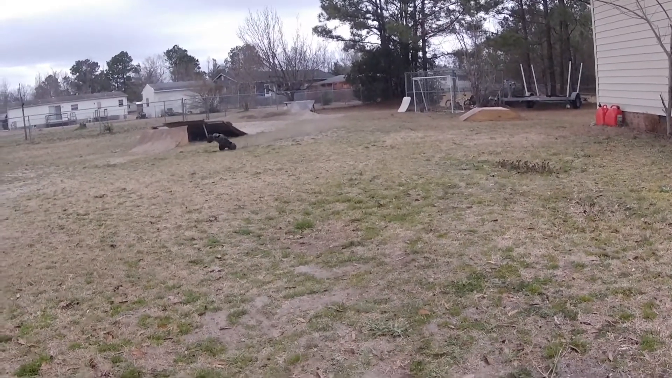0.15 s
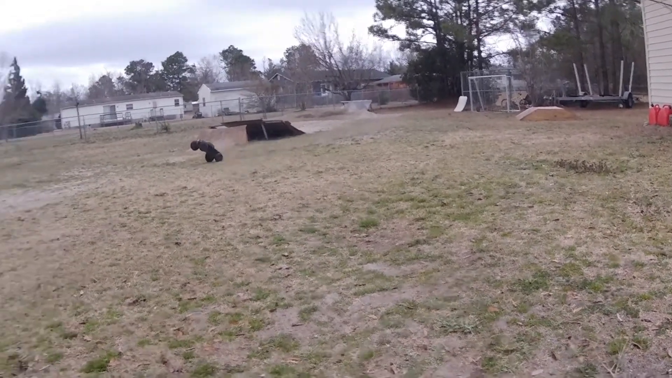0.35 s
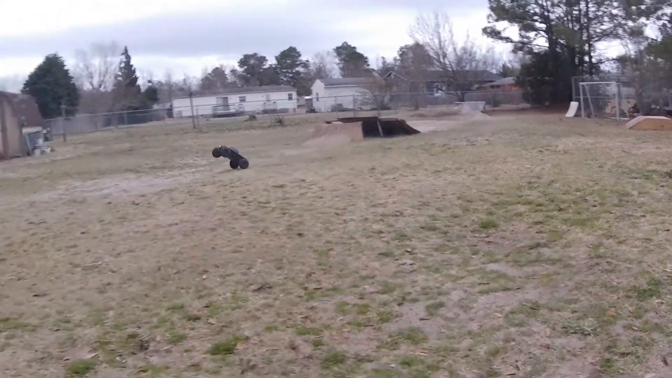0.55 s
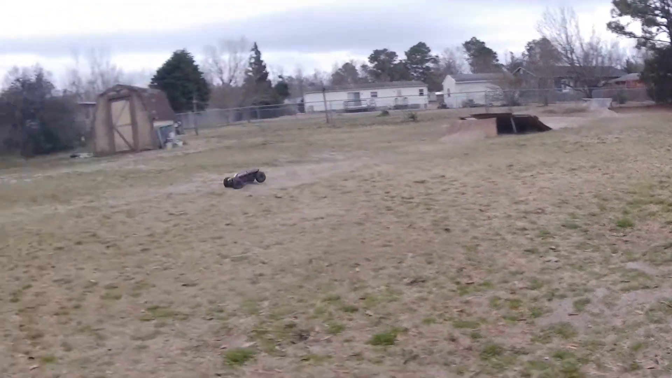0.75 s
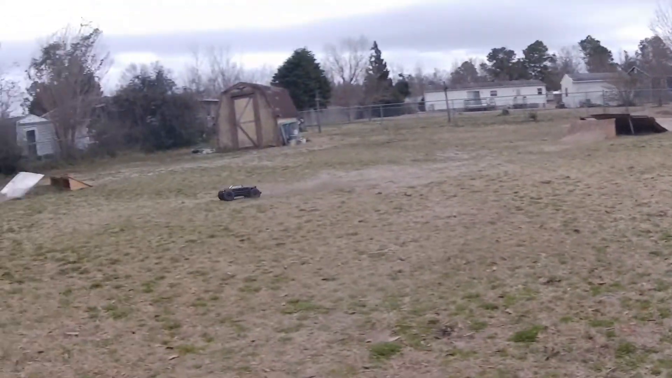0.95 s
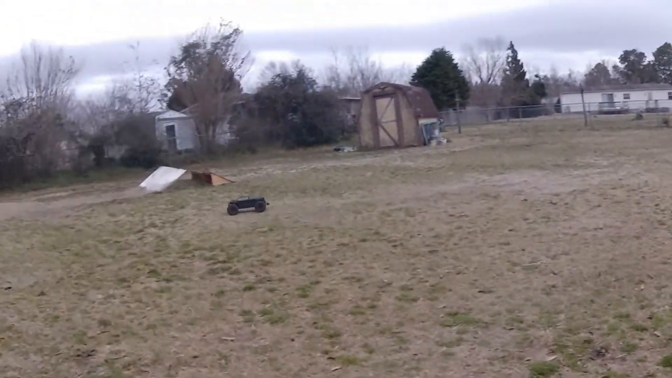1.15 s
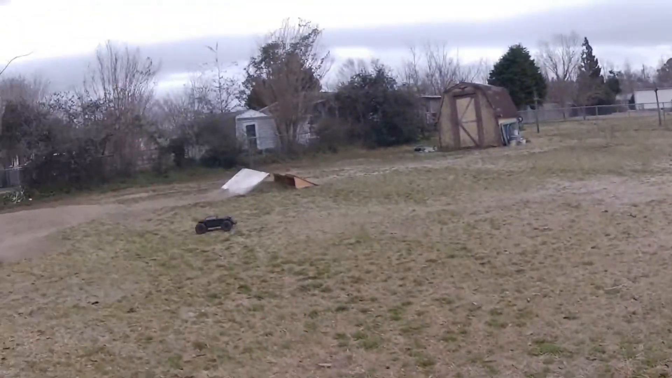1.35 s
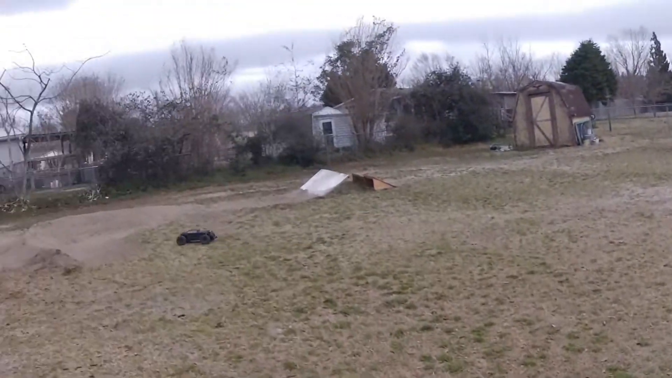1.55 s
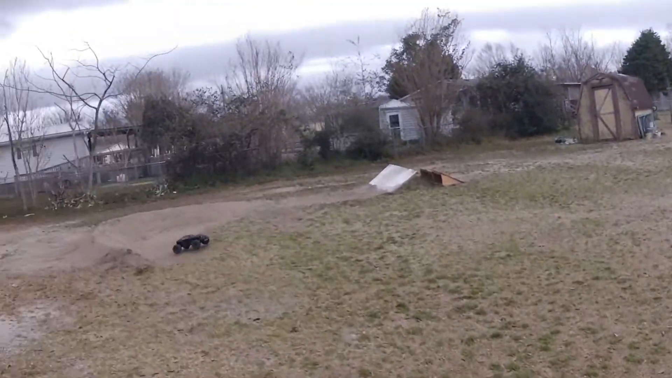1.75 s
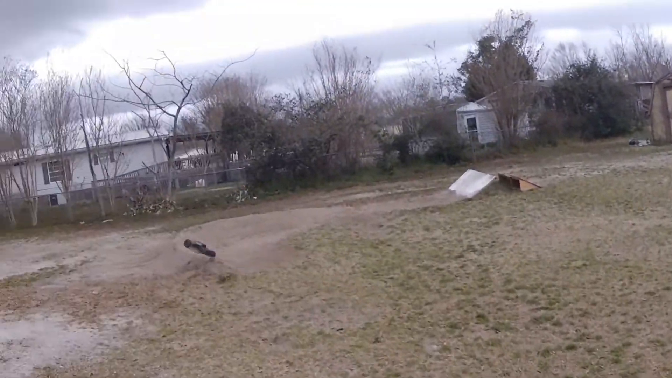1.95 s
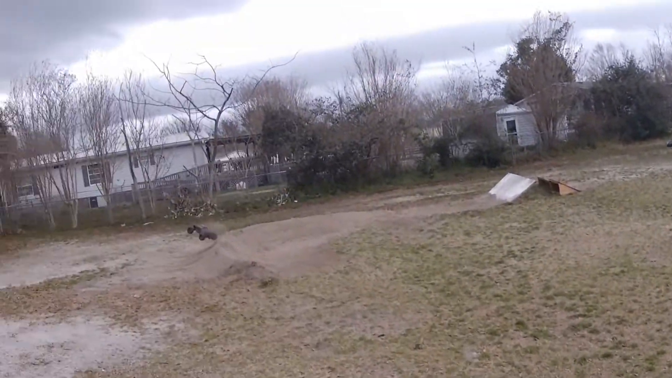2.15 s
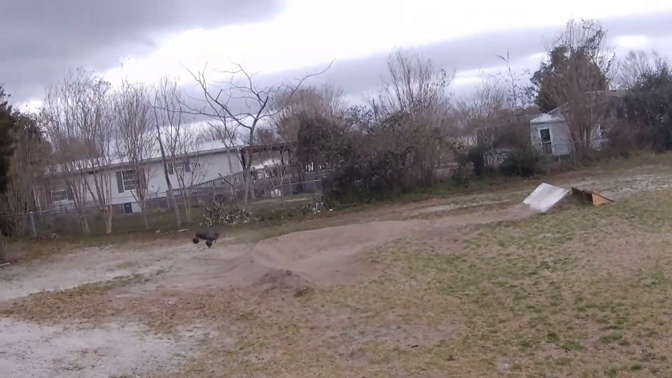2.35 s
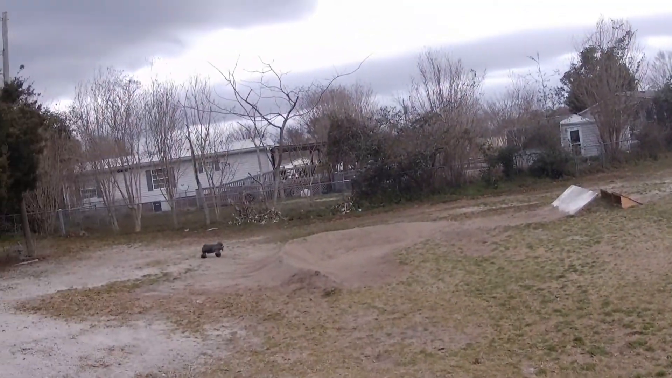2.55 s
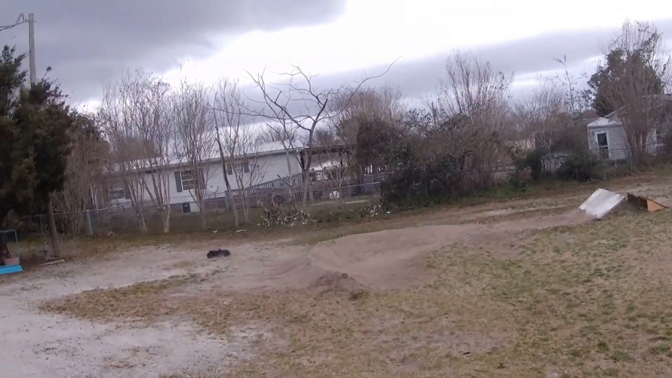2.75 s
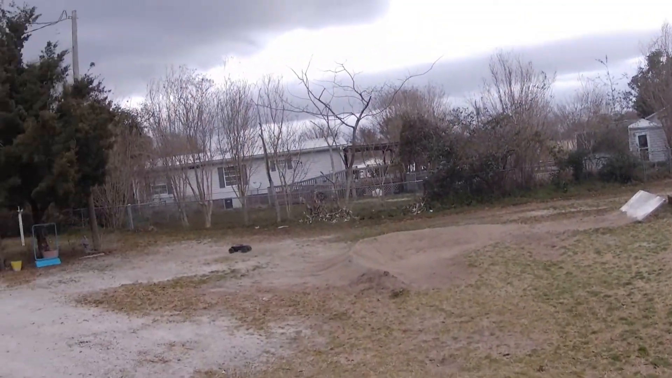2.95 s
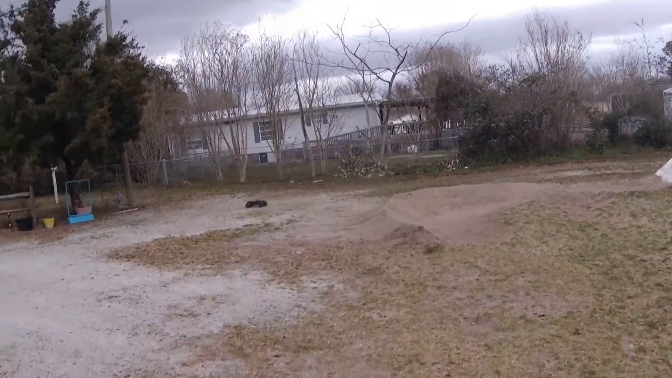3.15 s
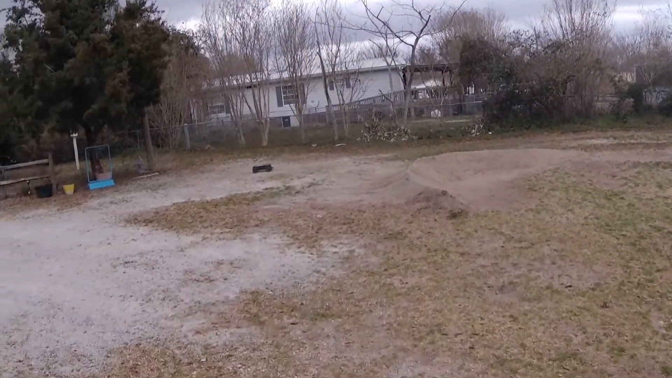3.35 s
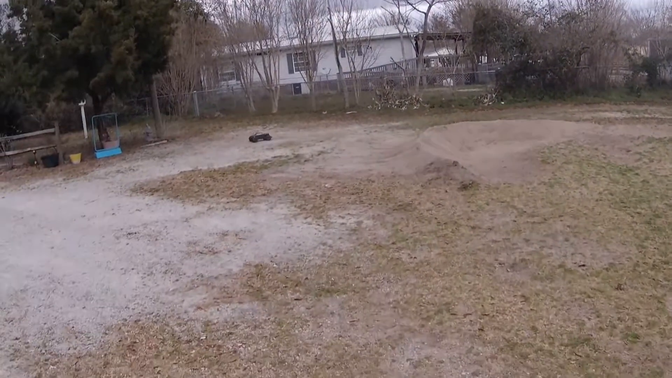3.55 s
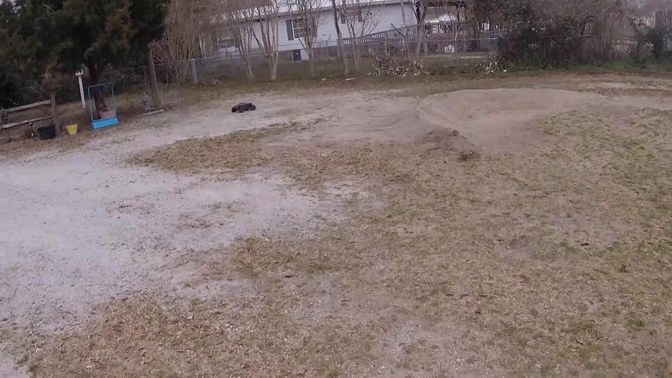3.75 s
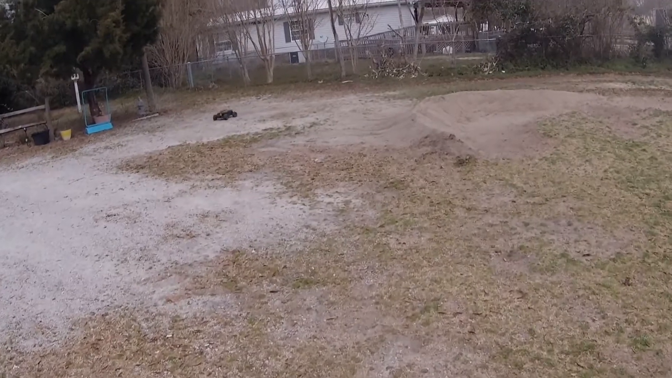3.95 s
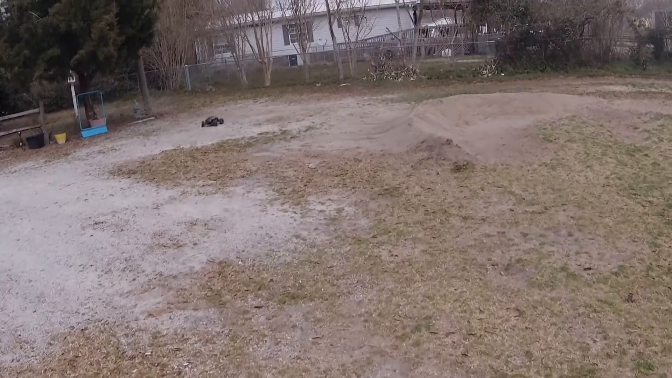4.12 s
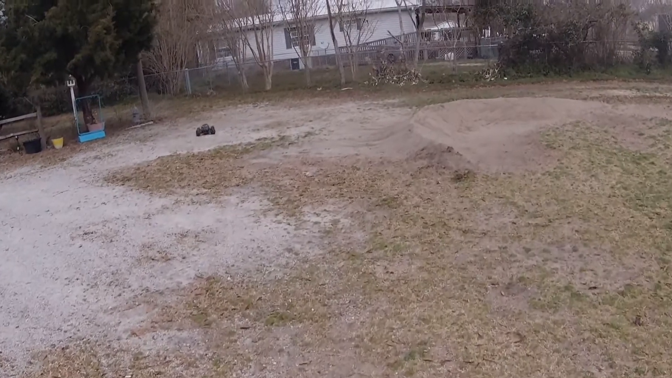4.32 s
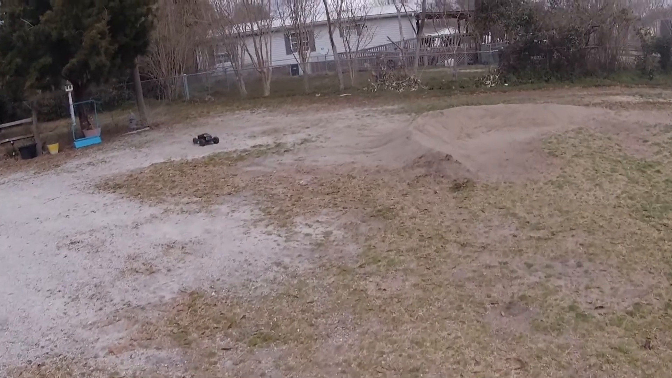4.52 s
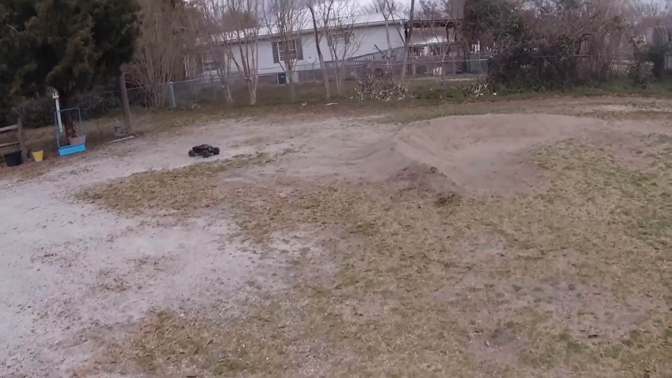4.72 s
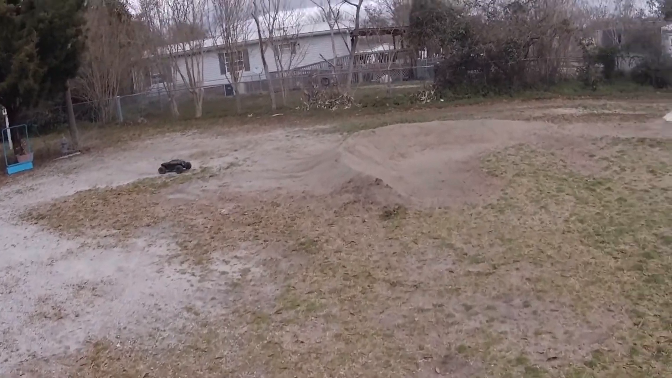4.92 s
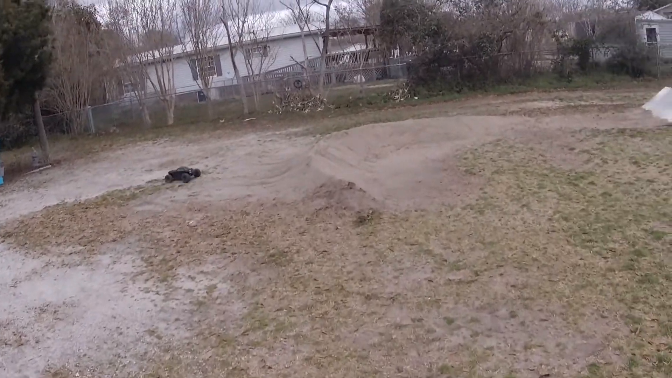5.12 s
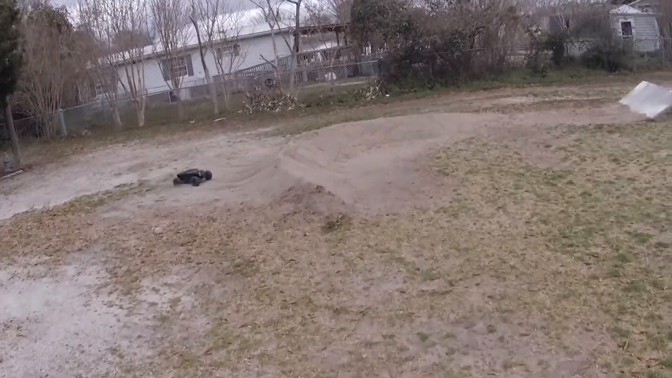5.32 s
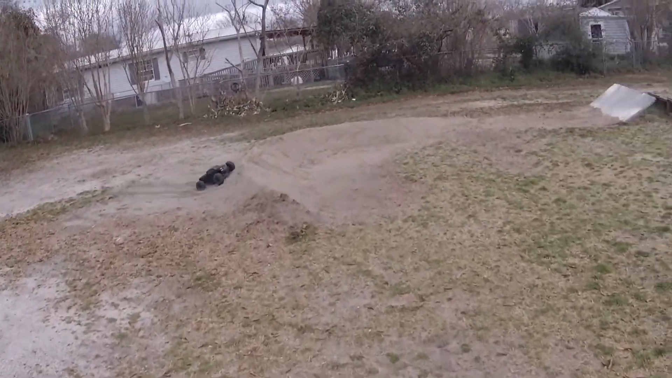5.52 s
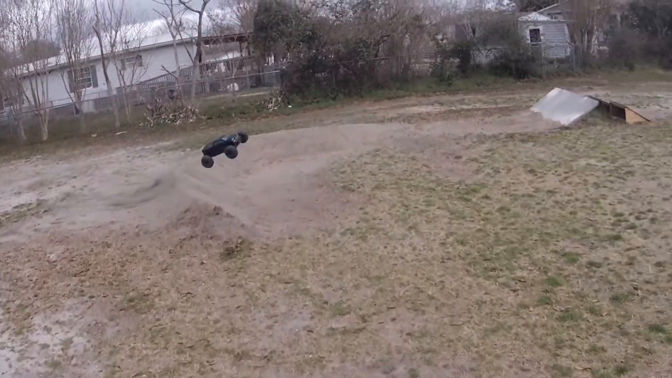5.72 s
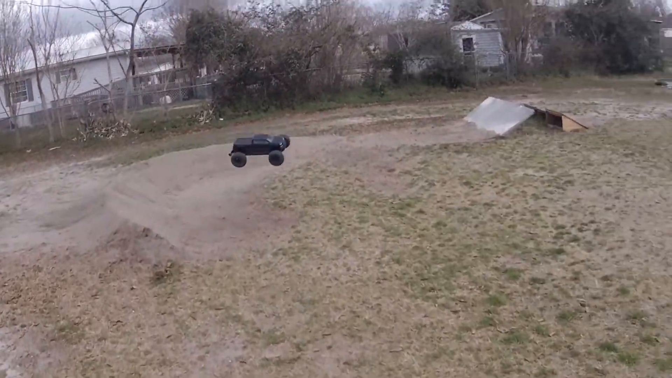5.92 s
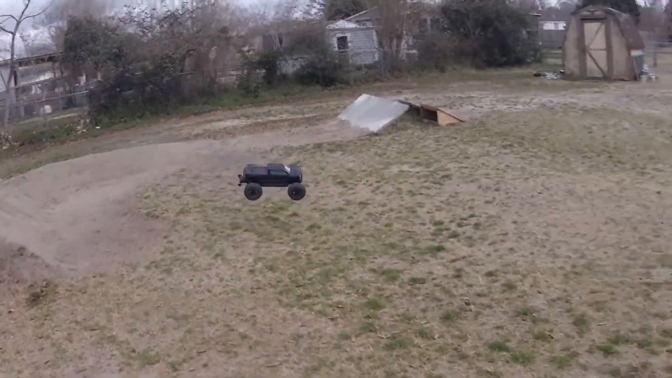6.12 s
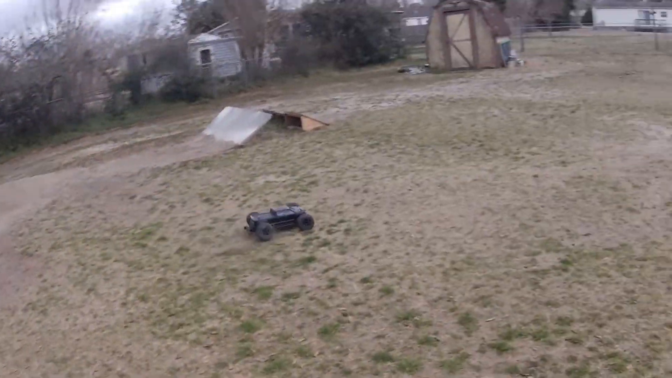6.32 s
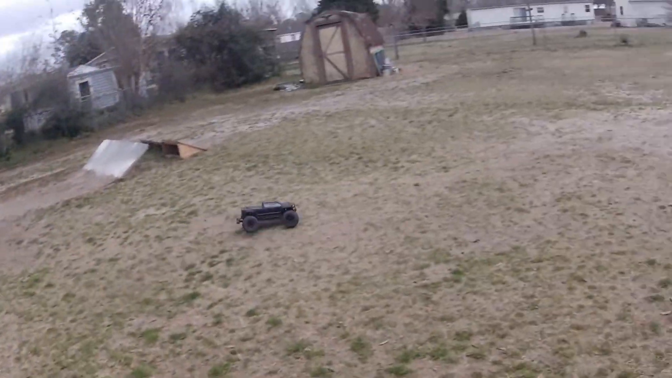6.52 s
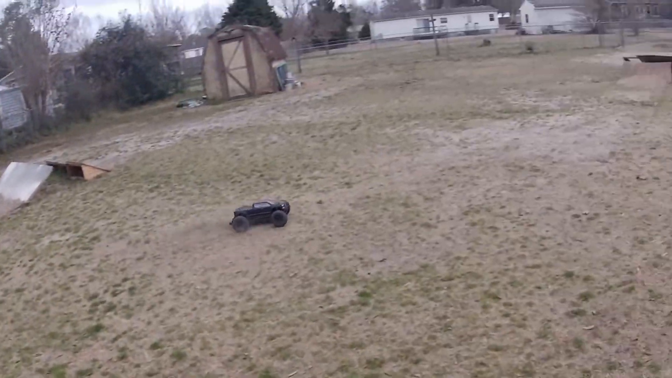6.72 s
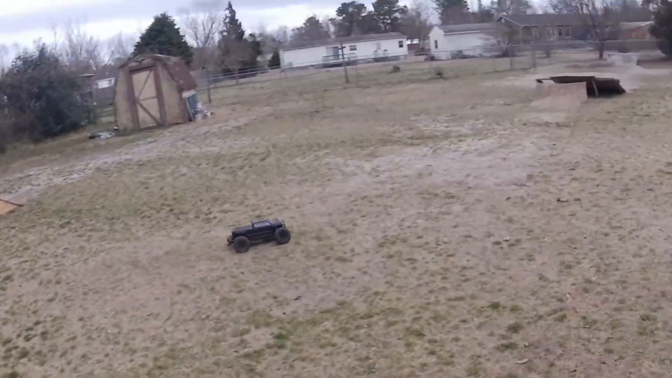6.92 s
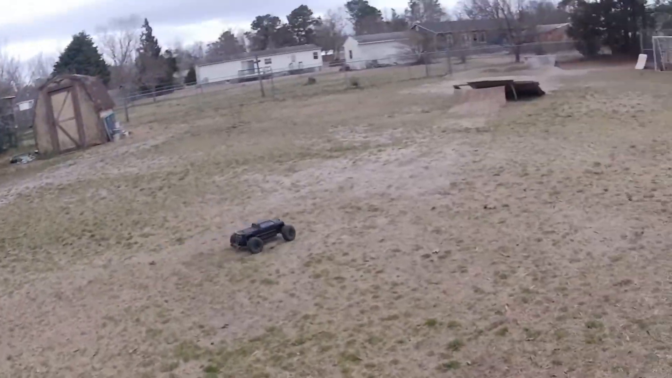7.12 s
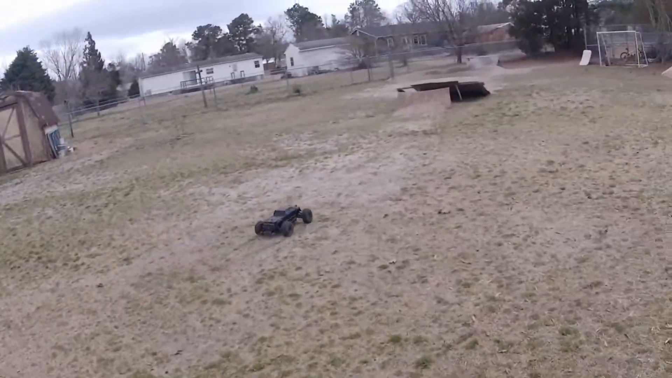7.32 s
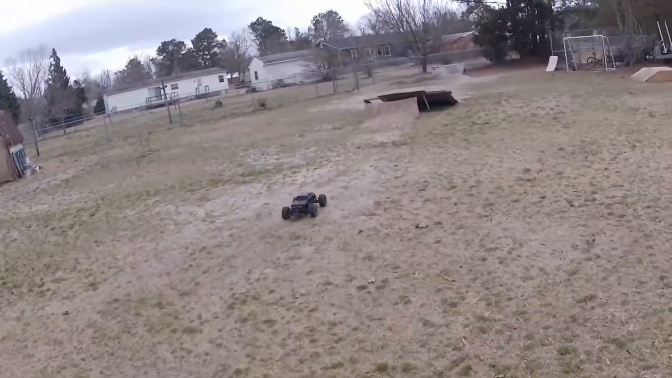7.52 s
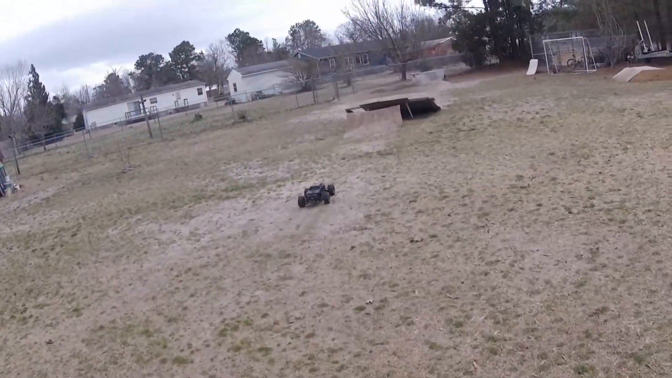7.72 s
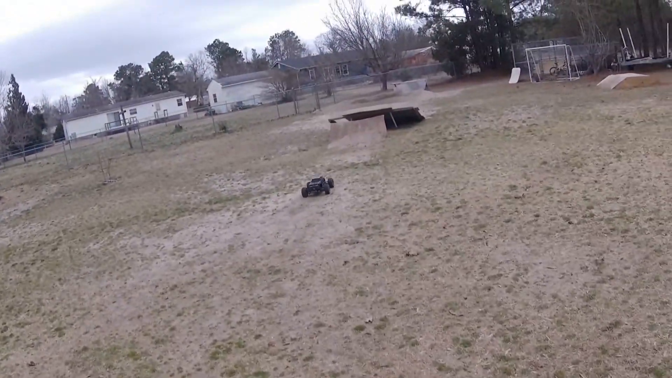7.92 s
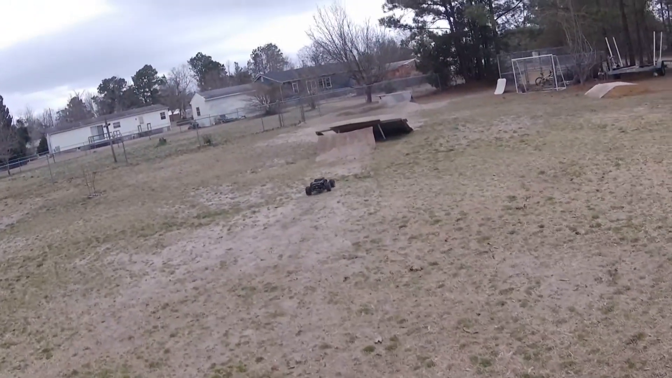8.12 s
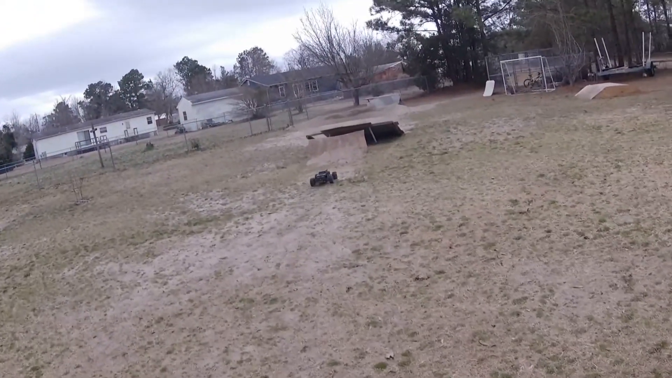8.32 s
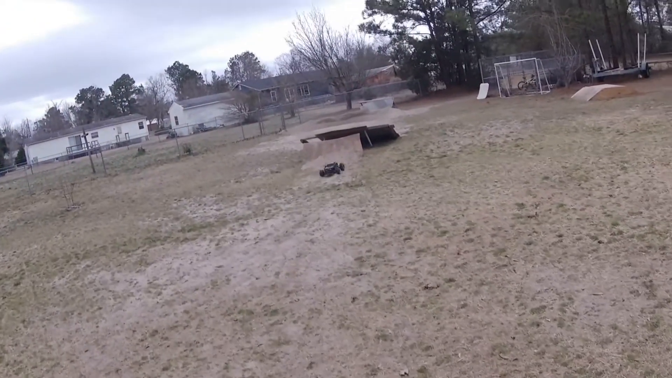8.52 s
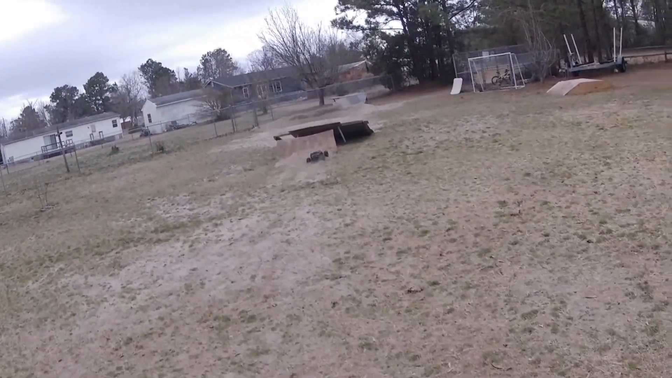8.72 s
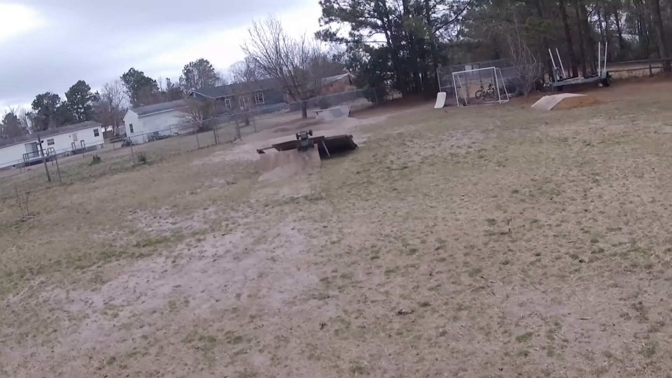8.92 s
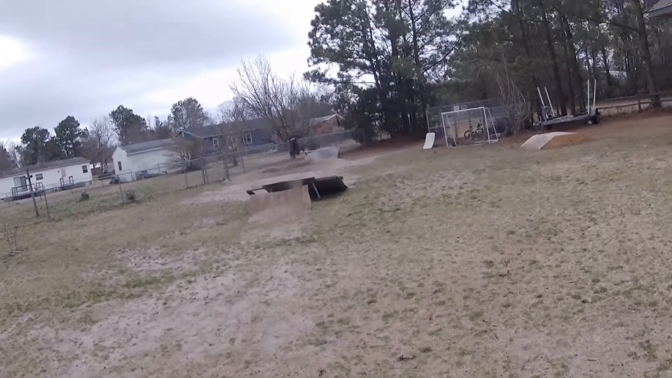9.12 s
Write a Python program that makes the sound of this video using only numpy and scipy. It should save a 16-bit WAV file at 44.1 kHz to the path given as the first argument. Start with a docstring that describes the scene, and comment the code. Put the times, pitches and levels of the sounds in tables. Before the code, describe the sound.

A small electric toy truck whines in shrill bursts around a rough yard, plastic chassis knocking hard on bumps and jump landings.

```python
"""A shrill motor whine, then two hard knocks: a radio-controlled monster truck laps a rough yard,
4 to 18 m ahead of a microphone with two close ports. The motor whines in bursts of throttle, the gears whirr,
the tyres rumble and scrub, and the plastic chassis knocks on bumps and landings. Speed, throttle and distance
set the running noise. Wind nudges the microphone, whose electronics add a thin, steady whistle."""
import sys
import numpy as np
from scipy import signal
from scipy.fft import rfft, irfft
from scipy.io import wavfile

SR = 44100
rng = np.random.default_rng(int(sys.argv[2]) if len(sys.argv) > 2 else 0)


def inscribe(sig):
    """Save sig as 16-bit PCM at rate SR to the path in sys.argv[1].

    A 1-D sig is mono; a 2-D sig holds one channel per row.
    Samples are clipped to [-1, 1] before scaling.
    """
    pcm = np.round(np.clip(np.atleast_2d(sig).T, -1, 1) * 32767)
    wavfile.write(sys.argv[1], SR, pcm.astype(np.int16))


N = 408366
T = np.arange(N) / SR
FREQS = np.maximum(np.fft.rfftfreq(N, 1 / SR), 1)
TOP_HZ = 15850  # the recorder's upper limit


def undb(db):
    """Decibels to gain."""
    return 10 ** (np.asarray(db) / 20)


def unit(x):
    """Scale to rms 1."""
    return x / np.sqrt(np.mean(x ** 2))


def curves(table):
    """The columns of a table, joined by straight lines in time."""
    seconds, *columns = np.transpose(table)
    return [np.interp(T, seconds, column) for column in columns]


def read(spectrum, hz):
    """A spectrum's dB at these frequencies, joined by straight lines over log frequency."""
    table_hz, db = np.transpose(spectrum)
    return np.interp(np.log(hz), np.log(table_hz), db)


def colour(x, spectrum):
    """Filter by a spectrum that falls 48 dB per octave beyond its ends, then scale to rms 1."""
    nearest_hz = np.clip(FREQS, spectrum[0][0], spectrum[-1][0])
    octaves_outside = np.abs(np.log2(FREQS / nearest_hz))
    gain = undb(read(spectrum, FREQS) - 48 * octaves_outside)
    return unit(irfft(rfft(x) * gain, N))


def walk(rate):
    """Smooth chance of spread 1 that changes about rate times a second."""
    smoothing = 1 + (FREQS / rate) ** 4
    return unit(irfft(rfft(rng.standard_normal(N)) / smoothing, N))


def grit(per_s, spread_db, share):
    """Lone clicks of uneven size over a dense bed of tiny ones."""
    happens = rng.random(N) < per_s / SR
    sign = rng.choice([-1, 1], N)
    size = undb(spread_db * np.minimum(rng.exponential(size=N), 4))
    return unit(rng.standard_normal(N) + share * unit(happens * sign * size))


# How far the two close ports differ. Each row: frequency in Hz, side minus mid in dB.
PORT_WIDTH = [(250, -58), (600, -79), (3000, -21.5), (10000, -7)]


def stereo(x, spectrum):
    """Colour a noise for the two close ports, which differ mainly in the treble."""
    side = irfft(rfft(rng.standard_normal(N)) * undb(read(PORT_WIDTH, FREQS)), N)
    return colour(np.array([x + side, x - side]), spectrum)


def fade(start, end, edge_s):
    """Open from start to end, with short ramps centred on both."""
    return np.clip(np.minimum(T - start, end - T) / edge_s + .5, 0, 1)


# The lap past the microphone. Each row: time in seconds, distance to the microphone in m.
LAP_DISTANCE = [(0, 10.9), (1, 8.2), (1.8, 10.1), (2.8, 9.7), (4.2, 13), (5.4, 10.4), (6.3, 4.43),
                (7.3, 5.15), (8.3, 10.35), (9.26, 18)]
REFERENCE_M = 10


def distance_db():
    """Sound weakens by 1 / distance."""
    metres, = curves(LAP_DISTANCE)
    return -20 * np.log10(metres / REFERENCE_M)


# The electronics' steady tones. Each row: frequency in Hz, rms level in dB.
WHISTLE_TONES = [(14147, -73.5), (15735, -69.5)]


def whistle():
    """The microphone's electronics leak steady sine tones."""
    return sum(np.sqrt(2) * undb(db) * np.sin(2 * np.pi * hz * T) for hz, db in WHISTLE_TONES)


# Colour of the quiet yard. Each row: frequency in Hz, relative level in dB per Hz.
YARD_SPECTRUM = [(60, -1), (124, -5.5), (160, -16.5), (300, -27.5), (590, -14.5), (1100, -31), (1700, -32),
                 (3090, -45.5), (4500, -52.5), (9500, -47.5), (15800, -36)]


def yard(level_db=-55.5):
    """The quiet yard is a broad noise whose level drifts slowly."""
    return stereo(rng.standard_normal(N), YARD_SPECTRUM) * undb(level_db + 3.3 * walk(1.1))


# Colour of wind at the microphone. Each row: frequency in Hz, relative level in dB per Hz.
WIND_SPECTRUM = [(18, 1), (63, -1), (134, -12), (320, -24.5)]
# Gusts on the microphone. Each row: start in seconds, end in seconds, level in dB.
WIND_GUSTS = [(-.1, 0.46, -46), (1.203, 1.576, -41.5), (2.15, 2.364, -50), (3.03, 3.43, -43),
              (3.618, 3.74, -40), (4.515, 4.9, -48), (4.97, 5.072, -44)]
BREEZE_DB, GUST_EDGE_S = -54, .08


def wind():
    """Air pressing on the microphone rumbles low; gusts add their power to a light breeze."""
    power = undb(BREEZE_DB) ** 2
    for start, end, db in WIND_GUSTS:
        power = power + (undb(db) * fade(start, end, GUST_EDGE_S)) ** 2
    return colour(rng.standard_normal(N), WIND_SPECTRUM) * np.sqrt(power) * undb(0.49 * walk(16))


# Colour of fine hiss from gears, treads and sand. Each row: frequency in Hz, relative level in dB per Hz.
HISS_SPECTRUM = [(3700, 2), (4200, -6), (4750, -1), (5150, -7), (5900, 3), (7400, -2.5), (8200, -14),
                 (9200, -5.5), (9800, -12), (10900, -3.5), (12500, -19), (14500, 0), (15500, -14.5)]
# Sand sprayed on the run-up, as heard. Each row: time in seconds, level in dB.
SPRAY_LEVEL = [(3.5, -72), (4.5, -66), (5.15, -57.5), (5.38, -51.5), (5.62, -50), (5.8, -64)]


def spray():
    """Driven tyres fling sand as the truck charges at the jump."""
    db, = curves(SPRAY_LEVEL)
    sand = stereo(grit(per_s=500, spread_db=1.5, share=0.99), HISS_SPECTRUM)
    return sand * undb(db + 2.2 * walk(25))


# Hollow drone near 1 kHz, as heard. Each row: time in seconds, level in dB.
DRONE_LEVEL = [(0, -50.5), (.7, -45), (1.0, -68), (5.1, -59), (5.5, -50.5), (6.8, -63), (7.7, -51.5),
               (8.4, -62), (9.0, -47), (9.26, -52.5)]
# Resonance of the plastic body. Each row: frequency in Hz, relative level in dB per Hz.
BODY_SPECTRUM = [(800, -7), (1040, 3), (1200, -5), (1400, -16)]


def drone():
    """The shaken plastic body drones at its main resonance."""
    db, = curves(DRONE_LEVEL)
    body = colour(grit(per_s=340, spread_db=3.5, share=0.36), BODY_SPECTRUM)
    return body * undb(db + 3.8 * walk(44))


# Colour of the scrubbed dirt. Each row: frequency in Hz, relative level in dB per Hz.
DIRT_SPECTRUM = [(200, -2.5), (320, -10.5), (460, 3.5), (800, -9.5), (1060, -4), (2000, -37.5),
                 (3090, -16.5), (4030, -40), (6070, -32), (9000, -37.5)]
# Tyres scrubbing into the dirt. Each row: time of the peak in seconds, level in dB, rise in seconds,
# fall in seconds, low thud against the grit in dB.
TYRE_SCRUBS = [(2.591, -42, 0.0052, 0.026, -8), (2.653, -37, 0.0095, 0.034, -9),
               (6.308, -21.5, 0.017, 0.022, -5.5), (8.79, -46, 0.015, 0.044, 9.5)]


def scrubs():
    """Soft tyres squash into the dirt: a gritty swell over a hollow thud."""
    dirt = stereo(grit(per_s=390, spread_db=5.5, share=0.63), DIRT_SPECTRUM)
    thud = colour(rng.standard_normal(N), [(60, -9), (115, -2), (190, 0), (260, -46)])
    out = 0
    for peak_s, db, rise, fall, thud_db in TYRE_SCRUBS:
        swell = np.exp(-np.maximum((peak_s - T) / rise, (T - peak_s) / fall))
        out = out + undb(db) * swell * (dirt + undb(thud_db) * thud)
    return out


# Colours of the tyre rumble and the gear whirr. Each row: frequency in Hz, relative level in dB per Hz.
TYRE_SPECTRUM = [(130, -7.5), (200, -2), (320, -12.5), (480, -1.5), (600, 1.5), (730, -4.5), (860, -3.5),
                 (1060, -5), (1310, -16.5), (1550, -19.5), (2200, -49)]
GEARBOX_SPECTRUM = [(1800, -19), (2400, -14), (2700, -4.5), (3240, 5), (3450, -1.5), (3890, -20.5),
                    (4600, -35)]
# Pace around the yard. Each row: time in seconds, speed of the wheel rims in m/s.
RIM_SPEED = [(0, 19), (.55, 17.1), (.72, 12.2), (.85, 6.05), (1.7, 5.54), (2.3, 6.1), (2.62, 1.9),
             (2.8, 0.68), (3.45, 0.94), (4.1, 4.7), (5.05, 4.73), (5.5, 6.8), (5.8, 8.6), (6.25, 7.9),
             (6.45, 3.24), (7.9, 3.1), (8.4, 3.2), (8.9, 12.9), (9.26, 9.3)]
# Wheels off the ground. Each row: take-off in seconds, landing in seconds.
AIRBORNE = [(-.1, 0.39), (2.19, 3.1), (5.69, 6.28), (8.999, 9.4)]
# Loudness laws. Each: level in dB at the reference distance and speed with no throttle, dB per doubling
# of speed, dB more at full throttle, dB more in the air.
TYRE_LAW = (-51.5, 7, 6, -7.5)
GEAR_LAW = (-59, 5, 8, 1.5)
TREAD_LAW = (-69, 11, 4.5, 1.5)
# Fine sizzle of the drive in the fast first second. Each row: time in seconds, level in dB before a 1 dB cut.
DRIVE_SIZZLE = [(0, -45.5), (.13, -57), (.24, -44), (.5, -58), (.72, -58), (.82, -76)]
REFERENCE_M_S = 5


def running_gear(throttle):
    """Tread blocks patter, gears whirr and treads swish with speed, load and nearness; the drive sizzles."""
    speed, = curves(RIM_SPEED)
    doublings = np.log2(speed / REFERENCE_M_S)
    airborne = sum(fade(take_off, landing, 0.013) for take_off, landing in AIRBORNE)
    nearness_db = distance_db()

    def level(law):
        """Level in dB over time by a loudness law."""
        db, speed_db, load_db, air_db = law
        return db + speed_db * doublings + load_db * throttle ** 2 + air_db * airborne + nearness_db

    ground = walk(29)  # uneven ground shakes tyres, gears and treads together
    tyres = stereo(grit(per_s=400, spread_db=4.5, share=0.6), TYRE_SPECTRUM)
    tyres = tyres * undb(level(TYRE_LAW) + 1.93 * ground)
    gears = stereo(grit(per_s=600, spread_db=3, share=.6), GEARBOX_SPECTRUM)
    gears = gears * undb(level(GEAR_LAW) + .8 * ground + 1.5 * walk(50))
    treads = stereo(grit(per_s=900, spread_db=4, share=.6), HISS_SPECTRUM)
    treads = treads * undb(level(TREAD_LAW) + 1.3 * ground)
    sizzle_db, = curves(DRIVE_SIZZLE)
    sizzle_spectrum = [(9000, -9), (12500, -8), (13700, 0), (15500, -4)]
    sizzle = stereo(grit(per_s=900, spread_db=4, share=.6), sizzle_spectrum)
    sizzle = sizzle * undb(sizzle_db - 1 + 2 * walk(60))
    return tyres + gears + treads + sizzle


# The drive groans under load after the hardest knock. Each row: time in seconds, pitch in Hz, level in dB.
LOAD_GROAN = [(8.796, 418, -58), (8.878, 565, -40), (8.923, 660, -34.5), (8.971, 643, -38.5),
              (8.99, 513, -53)]


def groan():
    """A low, rough tone with its octave as the drive takes up the load."""
    hz, db = curves(LOAD_GROAN)
    phase = 2 * np.pi * np.cumsum(hz * (1 + 0.038 * walk(92))) / SR
    tone = np.sqrt(2) * (np.sin(phase) + undb(-15) * np.sin(2 * phase))
    return tone * undb(db + 2 * walk(50)) * fade(LOAD_GROAN[0][0], LOAD_GROAN[-1][0], 0.0077)


# Blows to the chassis, as heard. Each row: time in seconds, peak in dB, place from 0 = suspension stop
# to 1 = skid plate, highest pitch of the contact in Hz, share of the ring left undamped.
CHASSIS_KNOCKS = [(.134, -10, 0.82, 6650, 0.42), (0.441, -9, 0.14, 7000, 0.69),
                  (1.438, -36.5, 0.11, 9000, 0.91), (2.162, -27.5, 0, 7000, 1),
                  (2.577, -50, 0.076, 2000, 0.7), (2.64, -30.5, 0.18, 1430, 0.93),
                  (3.005, -40.5, 0.17, 1200, .4), (3.035, -38.5, 0.18, 1200, 0.8),
                  (3.303, -41.5, 0.41, 5900, 0.37), (4.758, -30, 0.46, 14050, 0.33),
                  (5.651, -15.5, 0, 9050, 0.95), (6.075, -17.5, 0, 10150, 1), (6.759, -27.5, 0.14, 7900, 1),
                  (6.837, -19, 0.49, 980, 0.043), (7.1, -29.5, 0.27, 8730, 1),
                  (7.367, -22.5, 0.05, 8000, 1), (8.054, -30.5, 0.02, 1220, 0.43),
                  (8.767, -5.5, 1, 7950, 0.42)]
# Modes of the plastic chassis. Each row: frequency in Hz, 60 dB decay in seconds when undamped,
# relative level in dB struck at the suspension stop, the same struck at the skid plate.
CHASSIS_MODES = [(363, 0.044, -12, -14.5), (491, 0.026, -5.5, -6.5), (818, 0.022, -10.5, -4.5),
                 (1056, 0.094, -13.5, -2), (1186, 0.082, -21.5, -2), (2270, 0.18, -23.5, -41),
                 (2566, 0.0091, -0.5, 3.5), (3226, 0.019, -35, 2), (4353, 0.19, -30.5, -46),
                 (5915, 0.0047, -1.5, 11), (7470, 0.074, -25.5, -34)]


def knocks(attack_s=0.00068, rattle=0.049, rattle_s=0.012):
    """Each blow rings the chassis, and loose parts chatter for a moment after it."""
    size = SR // 4
    t = T[:size]
    hz, t60, stop_db, skid_db = np.transpose(CHASSIS_MODES)[:, :, None]
    sign = (-1) ** np.arange(len(hz))[:, None]
    waves = sign * np.sin(2 * np.pi * hz * t) * (1 - np.exp(-t / attack_s))
    out = np.zeros(N + size)
    for seconds, peak_db, place, contact_hz, free in CHASSIS_KNOCKS:
        strength = undb(stop_db + np.clip(place, 0, 1) * (skid_db - stop_db))
        decay = np.exp(-np.log(1000) * t / (t60 * free))
        ring = np.sum(waves * strength * decay, axis=0)
        push = rattle * rng.standard_normal(size) * np.exp(-t / (rattle_s * free))
        push[0] += 1  # the blow itself
        softness = signal.butter(3, min(contact_hz, TOP_HZ), fs=SR, output="sos")
        push = signal.sosfilt(softness, push)
        blow = signal.fftconvolve(push, ring)[:size]
        start = int(seconds * SR)
        out[start:start + size] += blow / np.abs(blow).max() * undb(peak_db)
    return out[:N]


# Gearbox shell, which colours the whine. Each row: frequency in Hz, gain in dB.
SHELL_GAIN = [(1100, 11.5), (1600, -14), (2100, -11.5), (2650, -6.5), (3120, 4.5), (3600, -2.5), (4100, -8),
              (4700, -3), (5300, -11), (5950, -1.5), (7200, -6), (8500, -12.5), (11000, -9), (14000, -11)]
# The long run-up from a crawl to the jump. Each row: time in seconds, mesh pitch in Hz,
# level of that tone as heard in dB, before its flutter.
LONG_RUN_UP = [(3.54, 1032, -49), (3.66, 1088, -48), (3.69, 944, -40.5), (3.72, 1115, -44.5),
               (3.84, 963, -47), (4.04, 1127, -46), (4.42, 1103, -49), (4.49, 1253, -48.5),
               (4.55, 1175, -43.5), (5.0, 1348, -59.5), (5.18, 1575, -63), (5.33, 2873, -55),
               (5.4, 3066, -32), (5.44, 3445, -48.5), (5.67, 3669, -47)]
# Short revs of the motor. Each row: start in seconds, end in seconds, mesh pitch at the start in Hz, pitch it
# swings towards in Hz, time of the swing in seconds, tone level in dB at the reference distance before the
# shell colours it, gear rasp from 0 to 1, throttle from 0 to 1.
THROTTLE_BURSTS = [(-.02, 0.068, 7820, 7700, 0.1, -41.5, 0.2, 0),
                   (0.158, .37, 7300, 6700, 0.089, -40.5, 0.2, 0.27),
                   (1.868, 2.15, 2730, 3390, 0.34, -52.5, 0.4, 0.45),
                   (5.99, 6.089, 3224, 4720, 0.087, -43.5, .9, .95),
                   (6.573, 6.792, 1607, 1873, .135, -57, 0.61, 0.94),
                   (6.953, 7.124, 1627, 2246, .135, -51.5, 0.72, 0.9),
                   (7.244, 7.39, 1750, 2640, .095, -50.5, .75, 1),
                   (7.61, 7.881, 1733, 1988, .2, -49, 0.67, 0.74),
                   (8.04, 8.321, 1865, 1950, .16, -53.5, 0.64, 0.7),
                   (8.42, 8.515, 1995, 2400, 0.16, -50.5, 0.79, 0.7),
                   (8.523, 8.65, 2850, 3700, 0.12, -44, .25, 0.9),
                   (8.774, 9.07, 2765, 7330, .315, -43.5, 0.16, 1),
                   (9.08, 9.3, 8800, 9150, .17, -52, 0, 0.86)]
RUN_UP_RASP, THROTTLE_EDGE_S = .18, .026
# on the run-up the throttle opens with the pitch, until that reaches CHARGE_HZ
CRAWL_THROTTLE, CHARGE_THROTTLE, CHARGE_HZ = 0.083, 0.91, 3110


def drive():
    """One long run-up, and bursts whose pitch swings out and may ease back, as controls for the motor."""
    hz, heard_db = curves(LONG_RUN_UP)
    gate = fade(LONG_RUN_UP[0][0], LONG_RUN_UP[-1][0], THROTTLE_EDGE_S)
    gain = gate * undb(heard_db - read(SHELL_GAIN, hz))  # the motor adds the shell's gain again
    rasp = gate * RUN_UP_RASP
    throttle = gate * np.interp(hz, [LONG_RUN_UP[0][1], CHARGE_HZ], [CRAWL_THROTTLE, CHARGE_THROTTLE])
    nearness = undb(distance_db())
    for start, end, from_hz, to_hz, swing_s, db, burst_rasp, opening in THROTTLE_BURSTS:
        on = fade(start, end, THROTTLE_EDGE_S)
        now = on > 0
        swing = np.sin(np.pi / 2 * (T[now] - start) / swing_s) ** 2
        hz[now] = from_hz + (to_hz - from_hz) * swing
        gain = gain + on * undb(db) * nearness
        rasp = rasp + on * burst_rasp
        throttle = throttle + on * opening
        gate = gate + on
    return hz, gain, np.clip(rasp, 0, 1), np.clip(throttle, 0, 1), gate


# Slack in the gears at full rasp: phase swing between alternate teeth in rad, once a turn of the pinion in rad,
# by chance in rad.
GEAR_SLACK = (.4, .55, .25)
PINION_TEETH = 5
SHAKE_SLOW, SHAKE_FAST, SHAKE_HZ = .048, .014, 26  # pitch spread from bumps at a crawl and at speed; its rate
JITTER, RASP_JITTER = .011, .016  # quick pitch spread: always, and more at full rasp
GEAR_HISS_DB, GEAR_HISS_RANGE_DB = -60, 14  # at full throttle and the reference distance; less at no throttle


def motor(hz, gain, rasp, throttle, gate):
    """Gear teeth sing at the mesh pitch; bumps shake the speed, and slack breaks the tone into a rasp."""
    # a slow truck feels each bump; at speed its momentum smooths them
    shake = np.interp(hz, [1130, 1350], [SHAKE_SLOW, SHAKE_FAST]) * walk(SHAKE_HZ)
    jitter = (JITTER + RASP_JITTER * rasp ** 2) * walk(120)
    phase = 2 * np.pi * np.cumsum(hz * (1 + shake + jitter)) / SR
    alternate, pinion, chance = GEAR_SLACK
    slack = alternate * np.sin(phase / 2) + pinion * np.sin(phase / PINION_TEETH) + chance * walk(260)
    phase = phase + rasp * slack
    tone = 0
    for k, part_db in enumerate([-0.5, -5.5, -8.0, -22.5], 1):  # multiples of the mesh pitch
        below_top = k * hz < TOP_HZ
        tone = tone + np.sin(k * phase) * below_top * undb(read(SHELL_GAIN, k * hz) + part_db)
    tone = np.sqrt(2) * tone * gain * undb(4 * walk(102))  # the level flutters
    # sliding teeth hiss, with a lower scrape under the hiss
    scrape_spectrum = [(1200, 29), (1900, 2), (2600, 1.5), (3300, 7), (4000, -31)]
    scrape = colour(rng.standard_normal(N), scrape_spectrum)
    hiss = stereo(grit(per_s=900, spread_db=3, share=.5), HISS_SPECTRUM) + undb(-3) * scrape
    hiss_db = GEAR_HISS_DB - GEAR_HISS_RANGE_DB * (1 - throttle) + distance_db() + walk(50)
    return tone + hiss * gate * undb(hiss_db)


def scene():
    """The truck stays straight ahead of the microphone, in open air with no echo."""
    hz, gain, rasp, throttle, gate = drive()
    surroundings = whistle() + yard() + wind()
    rolling = spray() + drone() + scrubs() + running_gear(throttle)
    return surroundings + rolling + groan() + knocks() + motor(hz, gain, rasp, throttle, gate)


def record(dry):
    """The recorder cuts the top steeply."""
    return signal.sosfilt(signal.ellip(12, .1, 80, TOP_HZ, fs=SR, output="sos"), dry)


dry = scene()
out = record(dry)
inscribe(out)
```